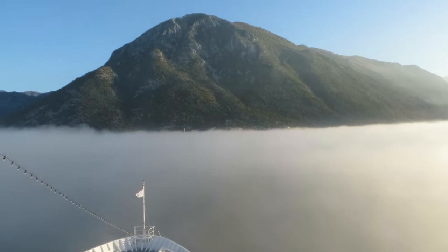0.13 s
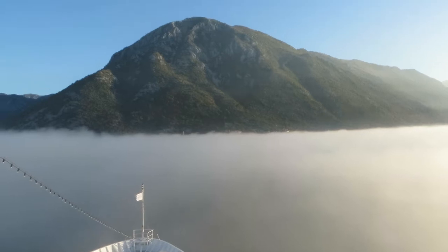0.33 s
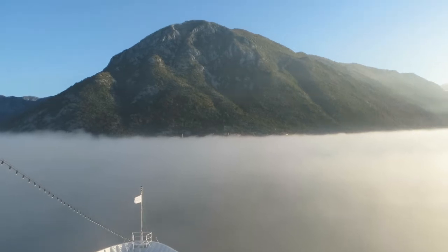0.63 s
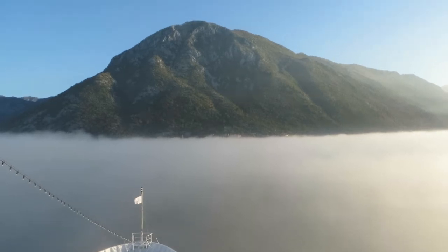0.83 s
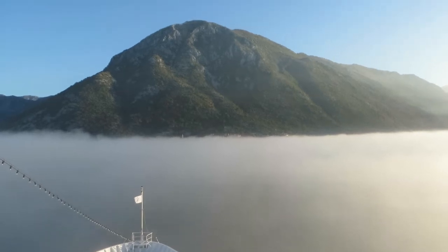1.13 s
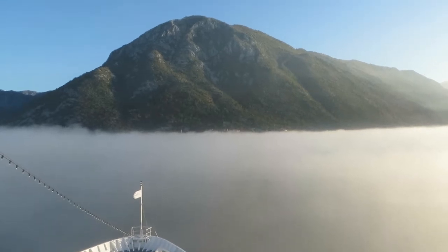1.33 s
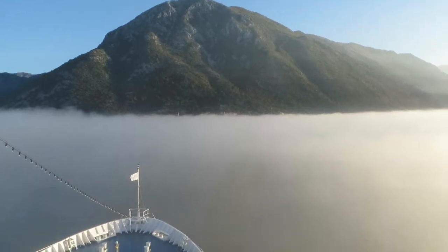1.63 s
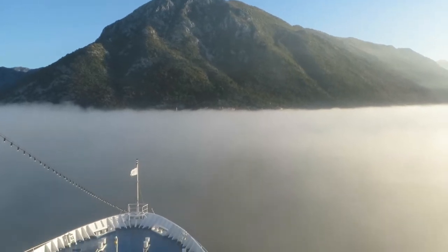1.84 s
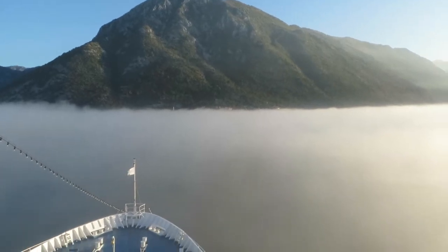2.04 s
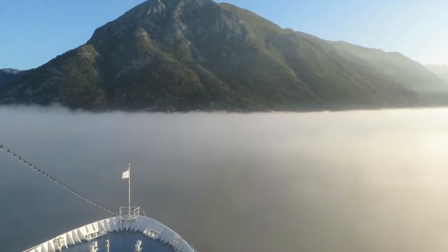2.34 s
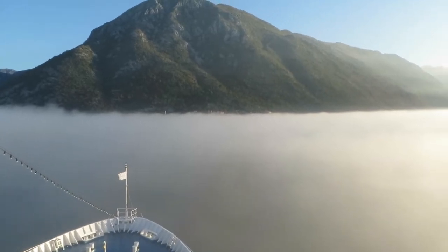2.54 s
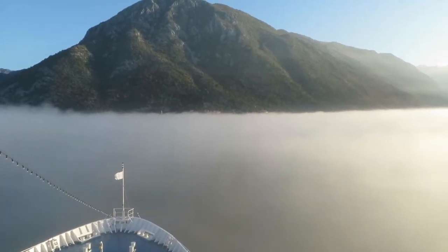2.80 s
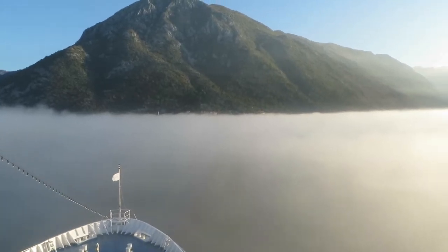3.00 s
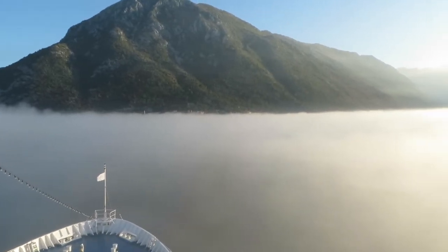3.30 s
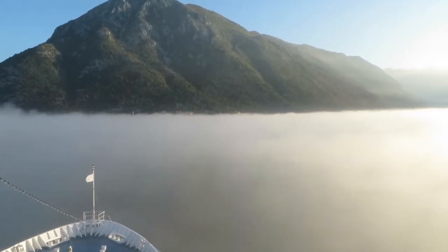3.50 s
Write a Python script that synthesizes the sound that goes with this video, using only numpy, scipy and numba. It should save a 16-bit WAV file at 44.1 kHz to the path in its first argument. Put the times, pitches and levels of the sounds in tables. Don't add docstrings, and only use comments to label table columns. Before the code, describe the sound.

One sustained low horn blast from a ship, heard nearby on its open deck, very loud and raspy with overload. Its tone shifts slightly through short reflections, while gusts buffet the small stereo microphone underneath.

```python
import sys
import numpy as np
from scipy import signal
from scipy.fft import rfft, irfft
from scipy.io import wavfile
from scipy.ndimage import uniform_filter1d
from numba import njit

SR = 44100
rng = np.random.default_rng(int(sys.argv[2]) if len(sys.argv) > 2 else 0)


def how_loud(loudness_db):
    steps = np.asarray(loudness_db, float) / 20
    return 10 ** steps


def store_wav(level_fs):
    pcm = np.round(np.clip(np.atleast_2d(level_fs), -1, 1) * 32767)
    wavfile.write(sys.argv[1], SR, pcm.T.astype(np.int16))


N = 161406
STEP = 256
OPPOSITE = np.array([[1], [-1]])

# t/s, pitch f/Hz, gain/dB on the whole sound after clipping
HORN_PITCH_CAMERA_GAIN = [
    (0.12, 125.1, -12),
    (0.37, 124.8, -13),
    (1.44, 125.1, -13),
    (1.76, 126.1, -13),
    (2.19, 125.2, -13),
    (2.22, 125.5, -12.5),
    (3.12, 125.9, -14),
    (3.31, 126.5, -12.5),
    (3.62, 125.8, -13),
]
# f/Hz, width/Hz, gain/1
BELL_MODES = [
    (476.7, 40.2, -.756),
    (1216, 179, -0.21),
]
# delay/s, drift/(s per s), dull above f/Hz
PATHS = [
    (-2e-06, -0.0, 809),
    (0.001295, -0.000333, 232),
    (0.002104, -8.3e-05, 940),
    (0.003252, 0.000409, 3900),
    (0.003668, -0.00013, 3950),
    (0.004256, 0.000281, 252),
    (0.007665, -3.9e-05, 4470),
]
TURN_S = [.15, .8, 1.601, 2.5, 3.4]
PATH_GAIN = [
    (1.0, 0.93, 0.85, 0.84, 0.52),
    (-0.97, -0.4, -0.48, -0.34, -0.33),
    (0.71, 0.34, 0.3, 0.11, -0.34),
    (-0.22, -0.34, -0.014, 0.037, -0.15),
    (0.13, 0.29, 0.043, 0.12, -0.098),
    (0.62, 0.7, 0.52, 0.38, -0.26),
    (-0.36, -0.29, -0.34, -0.33, -0.36),
]
# t/s, gain/1 on sound near HOLLOW_HZ; negative cancels
HOLLOW_GAIN = [
    (.1, -0.27),
    (.55, -0.6),
    (1.0, -0.08),
    (1.5, -0.23),
    (1.7, .1),
    (2.2, 0.15),
    (2.36, 1),
    (2.6, 0.052),
    (3.6, 0.37),
]
# f/Hz, density/dB per Hz
WIND_SPECTRUM = [(15, -57), (25, -31), (243, 2), (367, 1.5), (817, -9), (883, 5), (954, -37), (2070, -28),
                 (12000, -48), (15600, -88), (22000, -120)]
# t/s, level/dB
GUSTS = [(0.12, -47.5), (0.49, -42), (0.54, -47), (0.75, -38.5), (0.83, -53.5), (1.07, -43.5),
         (1.91, -50.5), (2.09, -44), (2.12, -57), (2.16, -45.5), (3.46, -46.5), (3.62, -55.5)]

PHASE_S, JITTER, PARTIALS = .0036, .0011, 100
HOLLOW_HZ, HOLLOW_WIDTH_HZ = 635, 44
WANDER_DB, WANDER_S, WANDER_PER_S = 0.17, .00001, 4
SHIMMER_S, SHIMMER_PER_S = .000003, 40
PAN_DB, PORTS_DB, PORTS_S, LAG_S = 0.6, 0.8, .000012, .000004
DIFFUSE_DB, DIFFUSE_HZ, DIFFUSE_PER_S = -19.5, 3150, 10
COMMON, APART_HZ = 4.5, 7150
HISS_DB, HISS_HZ, HISS_GATE_CYCLES = -35.5, 6800, 1
WIND_DB, WIND_ALIKE, GUST_DB, GUST_PER_S = 20, -0.75, 1.5, 22
RUMBLE_DB, RUMBLE_HZ, RUMBLE_SIDE_DB, RUMBLE_RISE_DB = -32, 62, -1.5, -0.5
START_S, FADE_S = .0822, 0.00065
DRIVE_DB, CLIP, KNEE, OUT_DB = 1.56, 0.32, 7.5, 12.5
COUPLING_HZ, TOP_HZ = (63.6, 55.7), 10830
WIND_CUT_S, WIND_CUT_HZ = .283, 71


def horn(t):
    s, hz, _ = np.array(HORN_PITCH_CAMERA_GAIN, float).T
    pitch_hz = np.interp(t, s, hz) * (1 + JITTER * per_sample(walk(30)[0]))
    phase = 2 * np.pi * np.cumsum(pitch_hz) / SR + 2 * np.pi * hz[0] * PHASE_S
    slow_s = np.arange(N // STEP + 2) * STEP / SR
    k = np.arange(1, PARTIALS + 1)[:, None]
    f = k * hz.mean()
    hollow = 1 + curve(HOLLOW_GAIN, slow_s) / (1 + ((f - HOLLOW_HZ) / HOLLOW_WIDTH_HZ) ** 2)
    arrivals = scattered(f) + echoes(f, slow_s)
    out = []
    for side, arrival in zip((1, -1), arrivals):
        tilt = np.clip(np.log2(f / 350), -1, 2) * np.exp(-f / 6000)
        pan = how_loud(side * PAN_DB / 2 * tilt)
        size = bell(f, k) * arrival * pan * hollow
        out.append(partials(phase, np.ascontiguousarray(size.T)))
    return np.array(out) + hiss(phase)


def bell(f, k):
    return 1 / k - sum(g * f * w / (c ** 2 - f ** 2 + 1j * f * w) for c, w, g in BELL_MODES)


def echoes(f, slow_s):
    loud_walk, late_walk, port_loud, port_late = walk(WANDER_PER_S, 4 * len(PATHS)).reshape(4, len(PATHS), -1)
    shimmer = walk(SHIMMER_PER_S, len(PATHS))
    ports = []
    for side in (1, -1):
        total = 0
        for j, ((delay_s, drift, dull_hz), gain) in enumerate(zip(PATHS, PATH_GAIN)):
            late_s = delay_s + drift * slow_s + WANDER_S * late_walk[j] + SHIMMER_S * shimmer[j]
            late_s = late_s + side * (PORTS_S * port_late[j] - LAG_S) / 2
            level_db = WANDER_DB * loud_walk[j] + side * PORTS_DB * port_loud[j] / 2
            loud = np.interp(slow_s, TURN_S, gain) * how_loud(level_db)
            total = total + loud * np.exp(-2j * np.pi * f * late_s) / (1 + 1j * f / dull_hz) ** 2
        ports.append(total)
    return np.array(ports)


def scattered(f):
    re, im = walk(DIFFUSE_PER_S, 4 * len(f)).reshape(2, 2, len(f), -1).swapaxes(0, 1)
    own = re + 1j * im
    band = f / DIFFUSE_HZ / (1 + (f / DIFFUSE_HZ) ** 2)
    ratio = f / APART_HZ
    shared = COMMON / (1 + ratio ** 4) + np.array([1, -1])[:, None, None] * ratio ** 2
    return how_loud(DIFFUSE_DB) * (shared * own[0] + own) * band


def hiss(phase):
    band = signal.butter(1, [HISS_HZ / 2, HISS_HZ * 0.93], "band", fs=SR, output="sos")
    air = signal.sosfilt(band, rng.standard_normal((2, N)))
    air = air * np.exp(-(phase / (2 * np.pi) % 1) / HISS_GATE_CYCLES)
    air = air + air[0] * OPPOSITE
    return how_loud(HISS_DB) * air / air.std()


@njit
def partials(phase, size):
    out = np.zeros(len(phase))
    for i in range(len(phase)):
        j, part = i // STEP, (i % STEP) / STEP
        z = np.exp(1j * phase[i])
        w = z
        for k in range(size.shape[1]):
            now = size[j, k] + part * (size[j + 1, k] - size[j, k])
            out[i] += (now * w).imag
            w *= z
    return out


def wind(t):
    gust_db = curve(GUSTS, t) + GUST_DB * per_sample(walk(GUST_PER_S)[0])
    mid, side = coloured(WIND_SPECTRUM, 2) * how_loud(gust_db)
    return how_loud(WIND_DB) * (np.sqrt(1 + WIND_ALIKE) * mid + np.sqrt(1 - WIND_ALIKE) * side * OPPOSITE)


def rumble(t):
    low = signal.butter(2, RUMBLE_HZ, fs=SR, output="sos")
    mid, side = signal.sosfilt(low, rng.standard_normal((2, N)))
    rise = np.clip((t - WIND_CUT_S) / 0.02, -1, 0)
    level = how_loud(RUMBLE_DB + RUMBLE_RISE_DB * rise) / mid.std()
    return level * (mid + how_loud(RUMBLE_SIDE_DB) * side * OPPOSITE)


def walk(rate_per_s, count=1):
    k = max(int(SR / STEP / rate_per_s), 1)
    knots = np.repeat(rng.standard_normal((count, 400)), k, axis=1)[:, :N // STEP + 2]
    smooth = uniform_filter1d(knots, k, axis=1)
    return 1.355 * uniform_filter1d(smooth, k, axis=1)


def per_sample(row):
    return np.interp(np.arange(N) / STEP, np.arange(len(row)), row)


def curve(table, at):
    return np.interp(at, *np.array(table, float).T[:2])


def coloured(points, count):
    hz, db = np.array(points, float).T
    bins_hz = np.arange(1, N // 2 + 2) * SR / N
    gain = how_loud(np.interp(np.log(bins_hz), np.log(hz), db))
    x = irfft(rfft(rng.standard_normal((count, N))) * gain, N)
    return x / x.std()


def scene():
    t = np.arange(N) / SR
    return horn(t) + wind(t) + rumble(t)


def low_pass(x):
    return signal.sosfilt(signal.butter(12, 13620, fs=SR, output="sos"), x)


def record(dry):
    t = np.arange(N) / SR
    x = dry * how_loud(DRIVE_DB) / CLIP
    x = CLIP * x / (1 + np.abs(x) ** KNEE) ** (1 / KNEE)
    x = x * np.clip((t - START_S) / FADE_S, 0, 1)
    x = np.array([signal.sosfilt(signal.butter(1, hz, "high", fs=SR, output="sos"), v)
                  for v, hz in zip(x, COUPLING_HZ)])
    cut = signal.sosfilt(signal.butter(2, WIND_CUT_HZ, "high", fs=SR, output="sos"), x)
    x = x + np.clip((t - WIND_CUT_S) / 0.0021, 0, 1) * (cut - x)
    x = signal.sosfilt(signal.butter(4, TOP_HZ, fs=SR, output="sos"), x)
    x = x * how_loud(OUT_DB + np.interp(t, *np.array(HORN_PITCH_CAMERA_GAIN).T[::2]))
    return low_pass(x)


dry = scene()
out = record(dry)
store_wav(out)
```